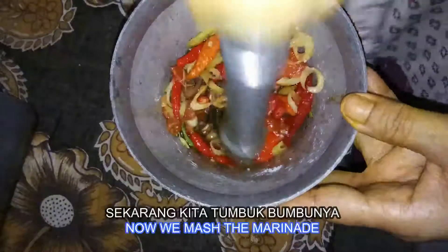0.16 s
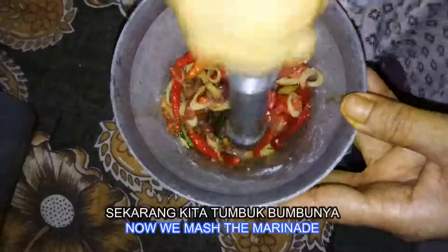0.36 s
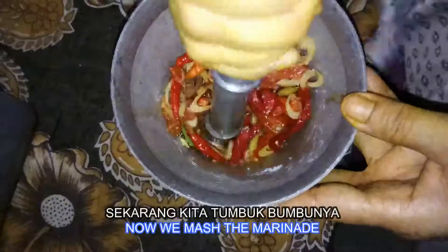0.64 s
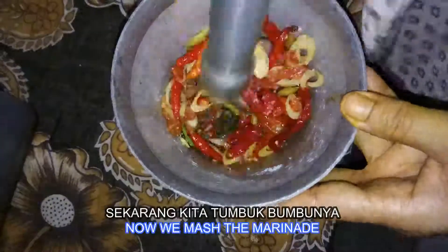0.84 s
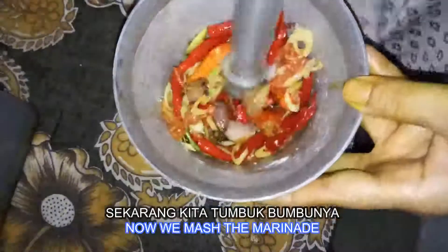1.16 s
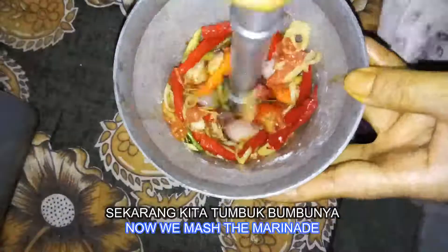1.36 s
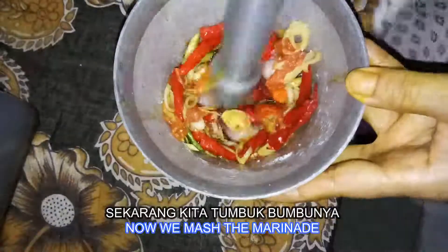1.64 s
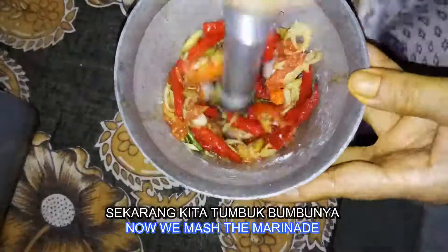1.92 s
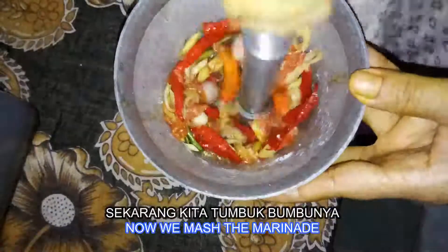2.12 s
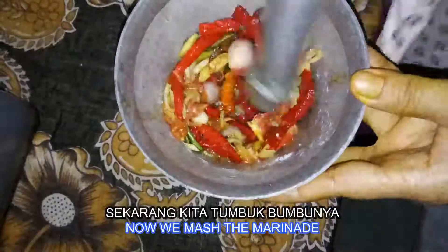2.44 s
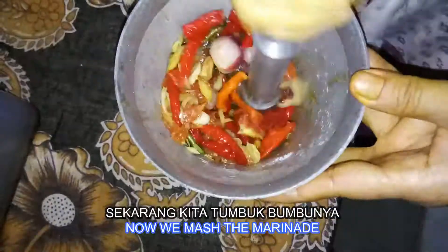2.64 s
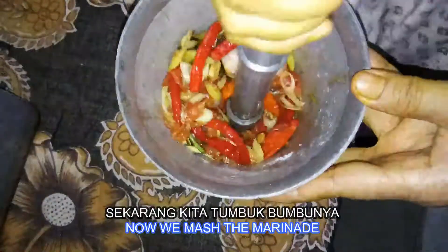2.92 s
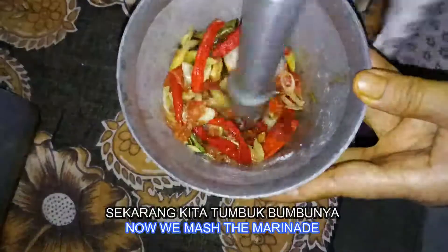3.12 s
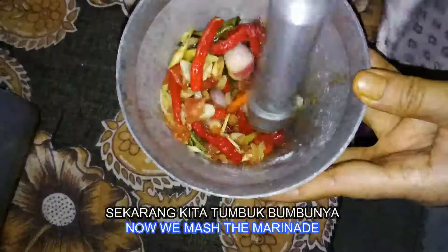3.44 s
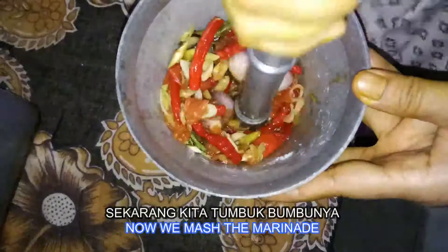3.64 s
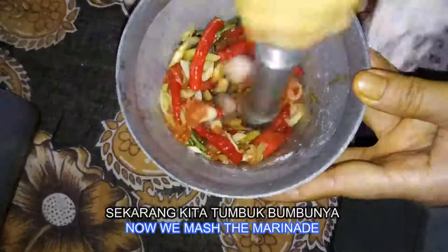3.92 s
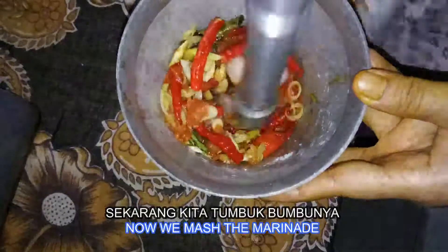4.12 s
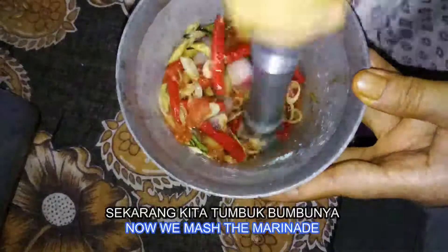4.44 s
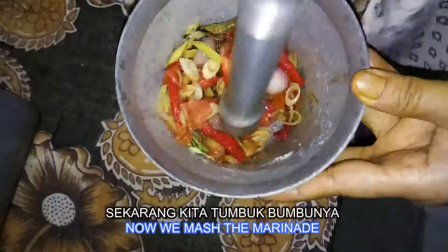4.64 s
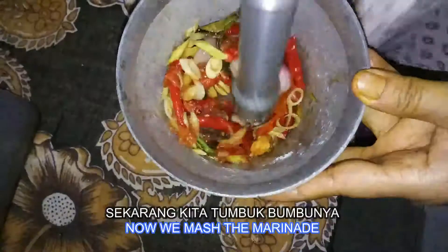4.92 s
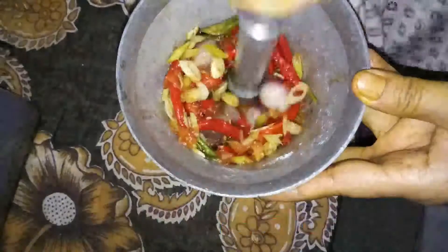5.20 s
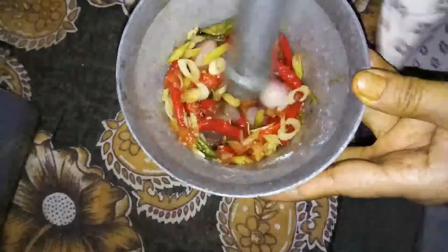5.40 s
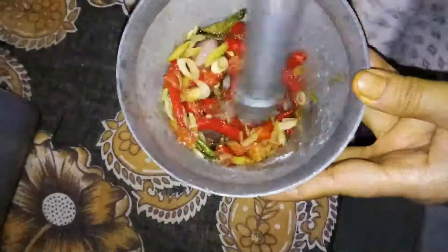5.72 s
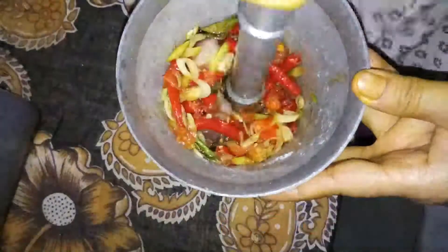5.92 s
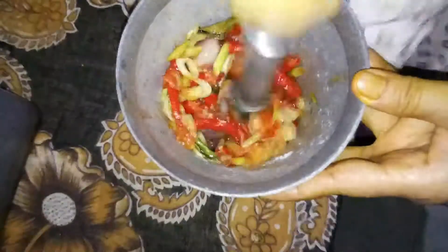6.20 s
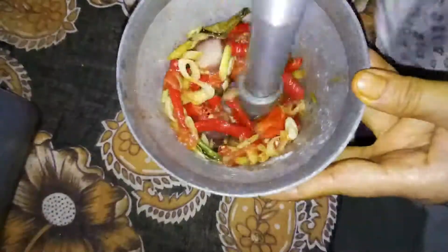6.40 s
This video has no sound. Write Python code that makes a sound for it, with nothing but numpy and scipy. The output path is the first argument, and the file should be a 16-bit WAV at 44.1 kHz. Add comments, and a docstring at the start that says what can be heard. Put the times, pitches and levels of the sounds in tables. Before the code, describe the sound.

A metal pestle pounds wet chillies and shallots in a metal mortar, dull low thuds with squelchy crackles and two short metallic clangs.

```python
"""In a small kitchen, a metal pestle pounds chillies, shallots and tomato in a hand-steadied metal mortar.
Each stroke squeezes the wet pulp into a crackle of tiny bursts and snaps, and lands with a low thud;
the thud is a set of dying low tones plus a burst of shaped noise. Three clangs on the metal wall join
noise for the clash with paired sine tones for the ring, the second choked almost at once.
The room answers with decaying noise, over a faint rumble and hiss. The mortar stands on cloth."""
import sys
import numpy as np
from scipy import signal
from scipy.fft import rfft, irfft
from scipy.io import wavfile

SR = 44100
rng = np.random.default_rng(int(sys.argv[2]) if len(sys.argv) > 2 else 0)


def master(y):
    """Save y as 16-bit WAV."""
    cut = np.clip(np.atleast_2d(y).T, -1, 1)
    pcm = np.round(cut * 32767)  # scale
    wavfile.write(sys.argv[1], SR, pcm.astype(np.int16))


N = 289296  # length of the scene in samples

# All levels in the tables are relative; the sources below set the final balance.

# Each stroke sinks through the pulp, pushing the mortar, then lands: (landing time [s], sinking time [s],
# crunch level [dB], push level [dB], thud level [dB], hardness as extra knock [dB], rise time of the thud [s])
STROKES = [(0.002, 0, -43, -42, -19.5, 25.5, 0.0046), (0.255, .005, -44, -27, 0, 3.5, 0.044),
           (0.6227, .019, -32, -24, 2.5, 10.5, 0.0024), (1.048, .053, -34.5, -36, -20.5, 3.5, 0.0064),
           (1.423, .024, -33.5, -25, -8, 3, 0.0086), (1.8095, .037, -28.5, -13.5, 0.5, 1, 0.0037),
           (2.1817, .036, -28, -19, 1.5, 3, 0.0028), (2.558, .03, -33.5, -28, -10, -2, 0.02),
           (2.9316, .029, -29.5, -20, 1, 17, 0.0012), (3.297, .033, -34, -13.5, -12.5, 7, 0.01),
           (3.648, .023, -29, -25, -7, 2, 0.0049), (4.006, .014, -34, -28, 2.5, 5.5, 0.0033),
           (4.353, .005, -39, -30, 1, 12.5, 0.041), (4.7308, .027, -31, -17, -0.5, 21, 0.00066),
           (5.1561, .04, -31.5, -10, 2, 5.5, 0.0049), (5.527, .019, -28.5, -25, -7, 3.5, 0.017),
           (5.9, .019, -33.5, -30, -16, 7, 0.014), (6.2799, .036, -32, -3.5, -2, 19.5, .0015)]
# Mortar rocking on its support: (frequency [Hz], level [dB], time to fall by 60 dB [s])
SUPPORT_MODES = [(61, -16, 0.11), (112.4, -0.5, 0.11), (167.2, -2.5, 0.1), (213.8, -17.5, 0.15),
                 (252.3, -27.5, 0.24), (278, -32, 0.34), (330.4, -21.5, 0.22), (404.4, -33.5, 0.21),
                 (488, -34.5, 0.17), (573, -43, 0.18), (613, -35.5, 0.19), (685, -35.5, 0.32),
                 (820, -74, 0.088), (822, -39.5, 0.34), (988, -41, 0.13), (1140, -56, .08),
                 (1380, -42, 0.18), (1830, -41, 0.17)]
# Dense, noisy part of a hard knock: (frequency [Hz], level [dB])
KNOCK_SPECTRUM = [(100, -19), (230, 7.5), (380, -1), (550, -7), (800, -7.5), (1050, -18), (1600, -18),
                  (2500, -22), (7000, -31), (14000, -42)]
# Single snaps and pops set by hand: skins, seeds, and small muffled knocks of pestle on bowl:
# (time [s], pitch of the pop [Hz], body level [dB], fizz level [dB])
PLACED_SNAPS = [(0.254, 2070, -23, -28), (0.616, 3000, -15, -12.5), (0.6195, 3280, -12, -21),
                (0.994, 2860, -31, -33), (1.0157, 2360, -32, -26.5), (1.026, 2260, -22, -36),
                (1.412, 3000, -17, -20), (1.4151, 1920, -18, -14), (1.42, 2040, -11, -31),
                (1.808, 3160, -19.5, -27), (2.1573, 890, -24, -27), (2.1711, 860, -23, -18.5),
                (2.5295, 875, -31.5, -26), (2.57, 3430, -45, -26), (2.925, 3060, -34, -14.5),
                (3.28, 2620, -23.5, -18.5), (3.296, 3600, -23, -15.5), (3.629, 3200, -18, -23),
                (3.639, 1740, -21.5, -18.5), (3.8547, 2400, -38, -39), (4.001, 2890, -12, -25),
                (4.004, 830, -18, -13), (4.3621, 3800, -14, -31), (4.72, 3220, -20, -25),
                (5.123, 3300, -31, -29), (5.512, 930, -14.5, -38), (5.5155, 880, -21.5, -26),
                (5.552, 2690, -24, -19.5), (5.8893, 2220, -17, -27), (6.2549, 2510, -18.5, -14)]
# Colour of the fuller part of the crunch in the bowl: (frequency [Hz], level [dB])
BODY_SPECTRUM = [(200, 8.5), (550, -15), (760, -1.5), (900, 6.5), (1200, -9.5), (1550, 1), (1950, 0),
                 (2600, 1), (3300, -1), (4500, -29.5)]
# Colour of the brighter, fizzing part of the crunch: (frequency [Hz], level [dB])
FIZZ_SPECTRUM = [(1800, -31), (3100, -6), (3700, -5), (4500, 4.5), (5300, -2), (6400, 3), (8100, -7),
                 (10100, -2), (11500, -10.5), (13300, -19), (14800, -5), (15500, -4.5)]
# Pestle on the metal wall: (time [s], ring level [dB], place on the wall [0-1], clash level [dB],
# skid level [dB], extra damping by pulp [dB per s])
CLANGS = [(0.2338, -1.5, 0.16, -3.5, -33, 70), (1.4185, -7, 0.3, -39, -58, 2200),
          (4.3334, -1, 0.8, -2.5, -24.5, 8)]
# Ringing of the bowl: (frequency [Hz], level struck at place 0 [dB], level struck at place 1 [dB],
# time to fall by 60 dB before the extra damping [s])
BOWL_MODES = [(859, -21, -22.5, 0.23), (892, -15.5, -25, 0.53), (975, -22, -37, 0.28),
              (1756, -47, -30, 0.52), (1694, -30, -27, 0.33), (2060, -23, -29, 0.059),
              (2090, -14, -20, 0.51), (2480, -14, -22, 0.042), (3807, -25.5, -17, 0.38),
              (4530, -34, -48, 0.12), (5340, -21, -33, 0.081), (5840, -46, -43, 0.36),
              (6240, -35, -47, 0.31), (6331, -41, -33, 0.13), (6600, -25, -49, 0.4), (6470, -31, -38, 0.34),
              (8500, -50, -35, 0.31), (8400, -34, -47, .25), (10200, -19, -53, 0.1),
              (11230, -26, -44, 0.19), (15300, -39, -29, 0.14)]
# Colour of metal first clashing on metal: (frequency [Hz], level [dB])
CLASH_SPECTRUM = [(150, 9), (600, -2), (900, 3), (1250, 3.5), (2200, 9), (3400, -5), (5000, 2), (5600, 0.5),
                  (6400, 14), (7600, -6), (10500, -3), (13200, -16.5), (15000, -2)]
# How long the kitchen echoes: (frequency [Hz], time to fall by 60 dB [s])
ROOM_DECAY = [(80, 0.55), (250, 0.58), (600, 0.47), (1500, 0.46), (4000, 0.4), (12000, 0.26)]
# Colour of the steady background: (frequency [Hz], level [dB])
BACKGROUND_SPECTRUM = [(20, -11), (45, 1), (125, 2), (340, -3), (450, -9.5), (750, -15.5), (1500, -11.5),
                       (2500, -15), (4500, -7), (6400, -3), (8000, -12), (10000, -7.5), (13500, -22.5),
                       (15000, -12.5)]

BACKGROUND_DB = -41.5  # typical level, before its small drift
TOP_HZ = 15600  # upper edge of the finished sound
# The push comes this share of the way down, and is always soft
PUSH_SHARE, PUSH_HARD_DB, PUSH_RISE_S = 0.39, -7.5, 0.0065
# Hard blows put their weight in the knock, so the range above it tilts down:
# tilt at zero hardness (dB per octave), and its fall per dB of hardness
SOFT_TILT_DB, TILT_PER_HARD = 3, 0.32
# Hard blows and light taps carry further into the room than deep, cushioned ones:
# room level (dB), its rise per dB of hardness, its fall per dB of blow level
THUD_ROOM_DB, ROOM_PER_HARD, ROOM_PER_LEVEL = -15.5, 0.26, 0.32
# Small snaps: level above the crunch (dB), most it strays either way (dB), range of their pops (Hz)
SMALL_SNAP_DB, SMALL_SPREAD_DB, SMALL_POP_HZ = -1, 4, (1720, 3850)
# Pulling free of sticky pulp: delay after landing (s), time it takes (s), reference level of the ticks (dB)
LIFT_DELAY_S, LIFT_S, LIFT_DB = 0.09, 0.13, -43


def thuds(contact_hz=2500, knock_hz=270, bass_hz=110, bass_loss=0.6, cloth_hz=60,
          knock_db=-32, knock_decay_s=0.032, knock_room_db=-3, size=28000):
    """Each blow rocks the mortar on its support; with less pulp underneath, it knocks higher and harder."""
    t = np.arange(size) / SR
    out = np.zeros(N)
    hz, mode_db, t60 = np.transpose(SUPPORT_MODES)[:, :, None]
    # How much each tone belongs to the knock range, and how much to the bass
    upper = 1 / (1 + (knock_hz / hz) ** 4) / (1 + (hz / 900) ** 3)
    lower = 1 / (1 + (hz / bass_hz) ** 4)
    for start, level_db, hard_db, rise in blows():
        tilt_db = SOFT_TILT_DB - TILT_PER_HARD * hard_db
        room_db = THUD_ROOM_DB + ROOM_PER_HARD * hard_db - ROOM_PER_LEVEL * level_db
        cushion = np.sin(np.pi / 2 * np.minimum(t / rise, 1)) ** 2  # thick pulp slows the onset

        shift = 1 + 0.0057 * upper * rng.standard_normal(hz.shape)  # grip and point of impact vary
        strength_db = mode_db + hard_db * (upper - bass_loss * lower) + tilt_db * octaves_up(hz)
        modes = amp(strength_db - 60 * t / t60) * np.cos(2 * np.pi * hz * shift * t)
        thud = band(modes.sum(0) * cushion, contact_hz, "low")
        thud = band(thud, cloth_hz, "high", order=4)

        spectrum = [(f, gain_db + tilt_db * octaves_up(f)) for f, gain_db in KNOCK_SPECTRUM]
        burst = rng.standard_normal(size) * cushion * np.exp(-t / knock_decay_s)
        knock = amp(knock_db + hard_db) * colour(burst, spectrum)

        to_room = amp(room_db) * thud + amp(knock_room_db) * knock
        to_room = band(to_room, 91, "high")  # the deepest part stays near the bowl
        add(out, start, amp(level_db) * (thud + knock + room(to_room)))
    return out


def blows():
    """Every stroke moves the mortar twice, a push and a landing: rows (start s, level dB, hardness dB, rise s)."""
    landings, pushes = [], []
    for land, sink, _, push_db, thud_db, hard_db, rise in STROKES:
        landings.append((land, thud_db, hard_db, rise))
        pushes.append((land - (1 - PUSH_SHARE) * sink, push_db, PUSH_HARD_DB, PUSH_RISE_S))
    return landings + pushes


def octaves_up(hz, from_hz=380, most=1.5):
    """Octaves above the middle of the knock, levelling off like a shelf."""
    return np.clip(np.log2(hz / from_hz), 0, most)


def crunch(squeeze_body_db=-1.5, squeeze_fizz_db=-1, snap_body_db=-2, snap_fizz_db=4, pop_db=4,
           pop_decay_s=0.0015, snap_decay_s=0.0024, swell=0.48, release_s=0.0031, room_db=-14):
    """Pulp fizzes as the pestle sinks in, with single snaps and pops; the bowl colours body and fizz."""
    body, fizz, pops = np.zeros((3, N))
    t = np.arange(SR // 12) / SR
    for start, length, crunch_db in squeezes():
        # Pressure grows over the first part of the squeeze, then lets go at its end
        growth = np.minimum((t + 0.0067) / (swell * length), 1)
        pressure = growth * np.exp(-np.maximum(t - length, 0) / release_s)
        add(body, start, amp(crunch_db + squeeze_body_db) * pressure * crackle(len(t), per_s=5000))
        add(fizz, start, amp(crunch_db + squeeze_fizz_db) * pressure * crackle(len(t), per_s=8000))
    t = np.arange(SR // 60) / SR
    onset = np.minimum(t / 0.00035, 1)
    for start, hz, body_db, fizz_db in PLACED_SNAPS + small_snaps():
        burst = rng.choice([-1., 1.], len(t)) * np.exp(-t / snap_decay_s) * onset
        pop = np.sin(2 * np.pi * hz * t) * np.exp(-t / pop_decay_s) * onset
        add(body, start, amp(body_db + snap_body_db) * burst)
        add(fizz, start, amp(fizz_db + snap_fizz_db) * burst)
        add(pops, start, amp(body_db + pop_db) * pop)
    wet = colour(body, BODY_SPECTRUM) + colour(fizz, FIZZ_SPECTRUM) + pops
    return wet + amp(room_db) * room(wet)


def squeezes(linger=1.3):
    """The pulp gives way from first touch until the thud has built up: rows (start s, length s, crunch dB)."""
    rows = []
    for land, sink, crunch_db, _, _, _, rise in STROKES:
        rows.append((land - sink, max(sink + linger * rise, 1 / SR), crunch_db))
    return rows


def crackle(count, per_s=5000, spread_db=3.0, cycles=1.7, bands=14):
    """Tiny wet cells bursting: dense grains of uneven size, each dying within a few cycles of its band's pitch."""
    out = np.zeros(count)
    for hz in np.geomspace(700, 15000, bands):
        size = amp(spread_db * np.minimum(rng.exponential(1, count), 4))
        size *= rng.choice([-1, 1], count)
        clicks = size * (rng.random(count) < per_s / bands / SR)
        # A one-pole resonator turns each click into a short dying tone
        pole = np.exp((2j * np.pi - 1 / cycles) * hz * rng.uniform(0.92, 1.08) / SR)
        grains = signal.lfilter([1], [1, -pole], clicks + 1e-12).imag
        out += np.sqrt(hz) * unit(grains)
    return unit(out)


def small_snaps(count=3):
    """A few faint snaps spread by chance through each squeeze and each lift, in rows like PLACED_SNAPS."""
    rows = []
    for start, length, level_db in squeezes() + lifts():
        for k, (when, pitch, body, fizz) in enumerate(rng.random((count, 4))):
            stray_db = SMALL_SPREAD_DB * (2 * np.array([body, fizz]) - 1)
            body_db, fizz_db = level_db + SMALL_SNAP_DB + stray_db
            pop_hz = np.interp(pitch, (0, 1), SMALL_POP_HZ)
            rows.append((start + length * (k + when) / count, pop_hz, body_db, fizz_db))
    return rows


def lifts():
    """After each landing the pestle peels out of the pulp: rows (start s, length s, level dB)."""
    return [(land + LIFT_DELAY_S, LIFT_S, LIFT_DB) for land, *_ in STROKES]


def clangs(clash_decay_s=0.0024, skid_decay_s=0.079, split_hz=9, twin_db=-5,
           clash_room_db=-7, ring_room_db=-15):
    """A clash, a dying rasp as the pestle skids, and the bowl's own tones, damped by hand and pulp."""
    t = np.arange(SR) / SR
    out = np.zeros(N)
    hz, first_db, second_db, t60 = np.transpose(BOWL_MODES)[:, :, None]
    for start, level_db, place, clash_db, skid_db, damping in CLANGS:
        struck_db = first_db + place * (second_db - first_db)
        mode_db = struck_db - (60 / t60 + damping) * t
        # The bowl is not quite round: each tone beats with a twin
        twin_hz = hz + split_hz * (1 + 0.26 * rng.standard_normal(hz.shape))
        pairs = np.sin(2 * np.pi * hz * t) + amp(twin_db) * np.sin(2 * np.pi * twin_hz * t)
        ring = (amp(level_db + mode_db) * pairs * rng.choice([-1, 1], hz.shape)).sum(0)

        contact = amp(clash_db) * np.exp(-t / clash_decay_s) + amp(skid_db) * np.exp(-t / skid_decay_s)
        clash = colour(contact * rng.standard_normal(len(t)), CLASH_SPECTRUM)
        to_room = amp(ring_room_db) * ring + amp(clash_room_db) * clash
        add(out, start, ring + clash + room(to_room))
    return out


def room(x, gap_s=0.0088, build_s=0.0099, size=512):
    """The kitchen's scattered reflections: noise that builds up, then dies at a rate set for each pitch."""
    hz, t, z = signal.stft(rng.standard_normal(SR), SR, nperseg=size)
    decay = amp(-60 * t / read(ROOM_DECAY, hz)[:, None])
    tail = signal.istft(z / abs(z) * decay, SR, nperseg=size)[1]  # keeps only the random phase of the noise
    tail *= np.clip((np.arange(len(tail)) / SR - gap_s) / build_s, 0, 1)
    return signal.oaconvolve(x, tail / np.linalg.norm(tail))[:len(x)]


def background(drift_db=0.37):
    """Low room rumble and hiss: shaped noise, drifting a little in level."""
    spectrum = rfft(rng.standard_normal(N))
    gain = amp(read(BACKGROUND_SPECTRUM, np.fft.rfftfreq(N, 1 / SR)))
    steady = unit(irfft(spectrum * gain, N))
    return amp(BACKGROUND_DB + drift_db * wander(N, size=4000)) * steady


def wander(count, size):
    """Smooth random curve of rms 1 that changes over about size samples."""
    noise = rng.standard_normal(count + 2 * size - 1)
    return unit(signal.oaconvolve(noise, signal.windows.hann(2 * size), "valid"))


def amp(db):
    """Decibels to gain."""
    return 10 ** (np.asarray(db) / 20)


def unit(x):
    """Scales to rms 1."""
    return x / np.sqrt(np.mean(x ** 2) + 1e-20)


def read(points, hz):
    """Reads between the points of a table on a log-frequency axis."""
    f, value = np.transpose(points)
    return np.interp(np.log(hz + 1), np.log(f + 1), value)


def add(mix, start, sound):
    """Mixes a sound in at start seconds, or at the very beginning if that is negative."""
    part = mix[max(round(start * SR), 0):][:len(sound)]
    part += sound[:len(part)]


def colour(x, points, size=4096):
    """Filter with the given spectrum that never sounds ahead of its input, keeping the power of white noise."""
    log_gain = np.log(amp(read(points, abs(np.fft.fftfreq(size, 1 / SR)))))
    response = np.exp(np.conj(signal.hilbert(log_gain)))  # minimum phase
    taps = np.fft.ifft(response).real[:size // 2]
    return signal.oaconvolve(x, taps / np.linalg.norm(taps))[:len(x)]


def band(x, hz, kind, order=2):
    """Low-pass or high-pass."""
    return signal.sosfilt(signal.butter(order, hz, kind, fs=SR, output="sos"), x)


def scene():
    """All sources at one close microphone."""
    return (thuds() + crunch() + clangs() + background())[None]


def record(dry):
    """The loudest peaks are rounded off; then the highest treble is cut away."""
    rounded = dry / (1 + dry ** 6) ** (1 / 6)
    low_pass = signal.firwin(511, TOP_HZ, window=("kaiser", 9), fs=SR)
    return signal.oaconvolve(rounded, low_pass[None], "same")


dry = scene()
out = record(dry)
master(out)
```